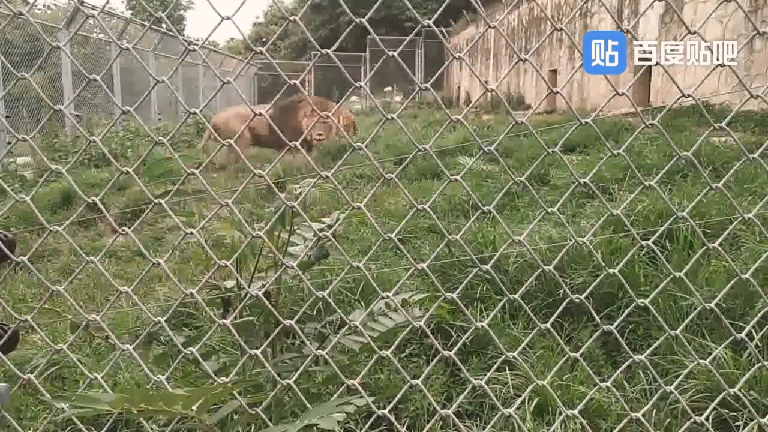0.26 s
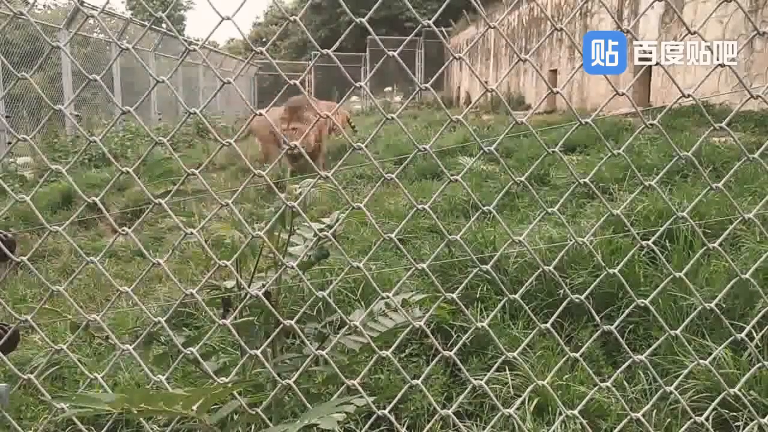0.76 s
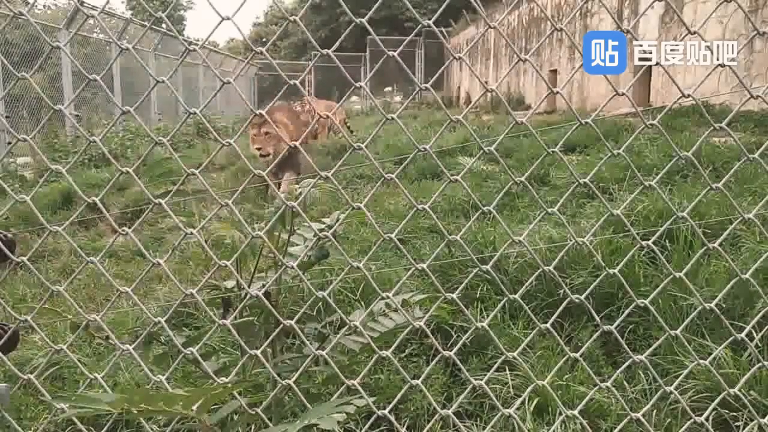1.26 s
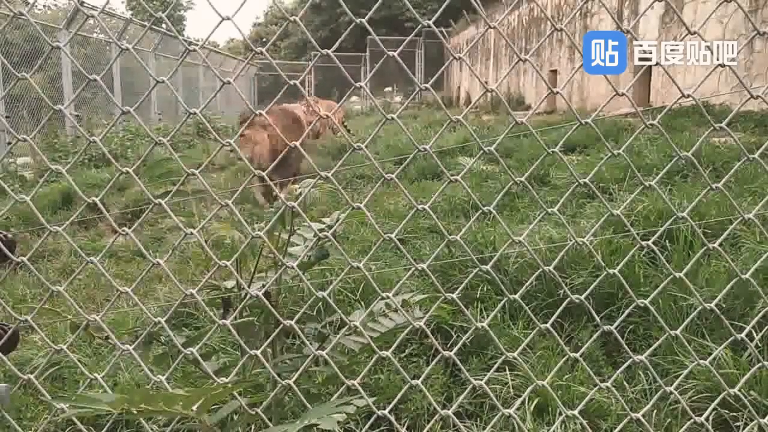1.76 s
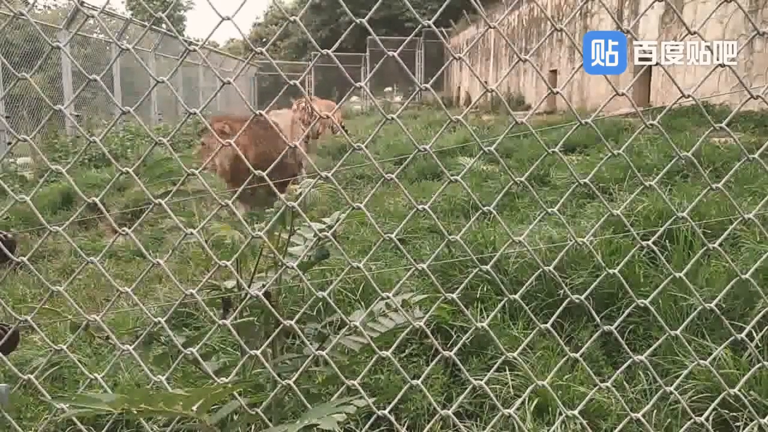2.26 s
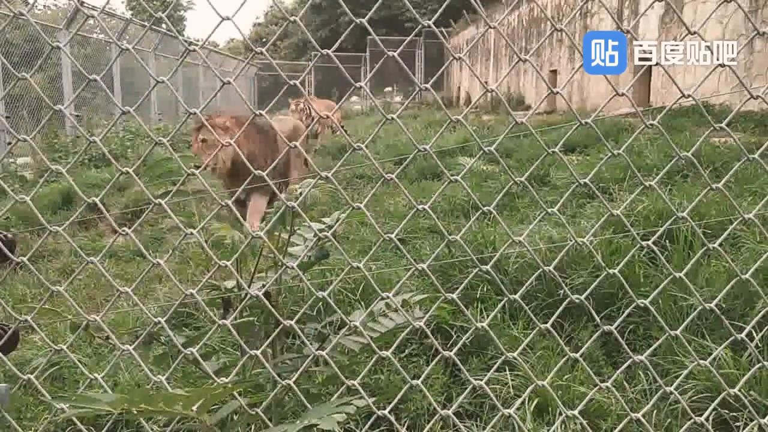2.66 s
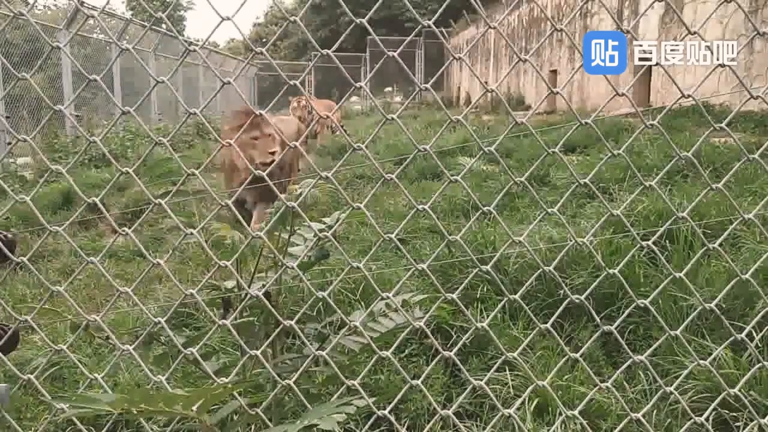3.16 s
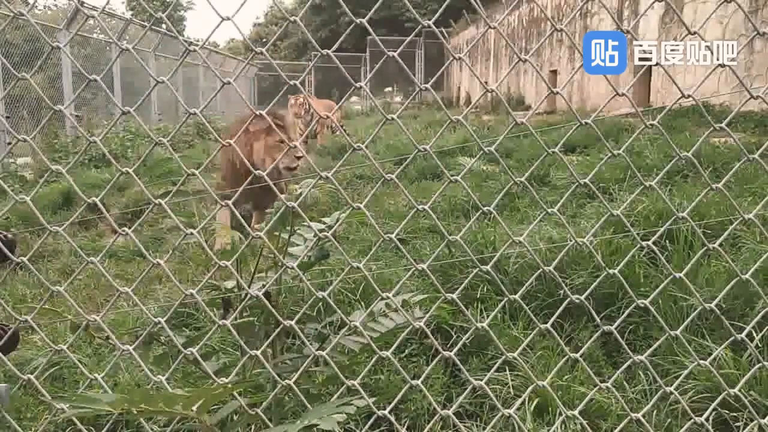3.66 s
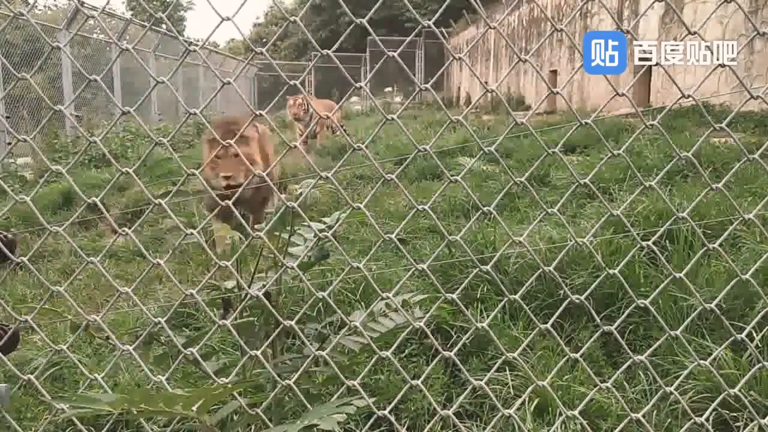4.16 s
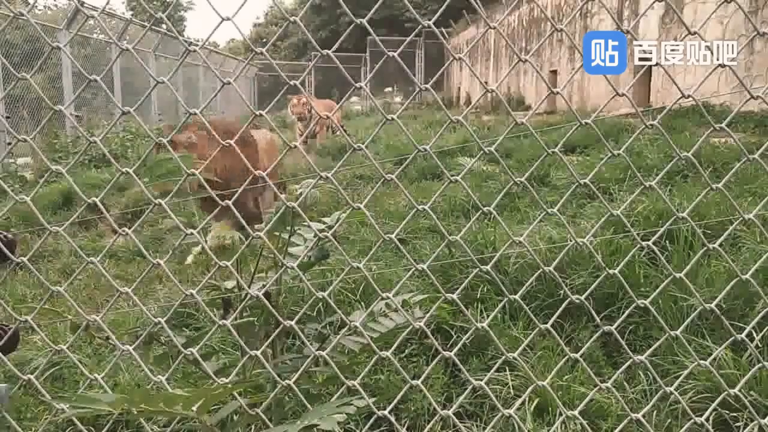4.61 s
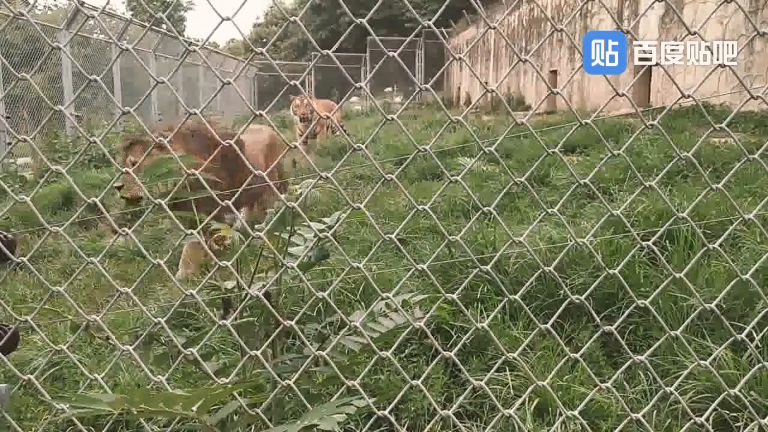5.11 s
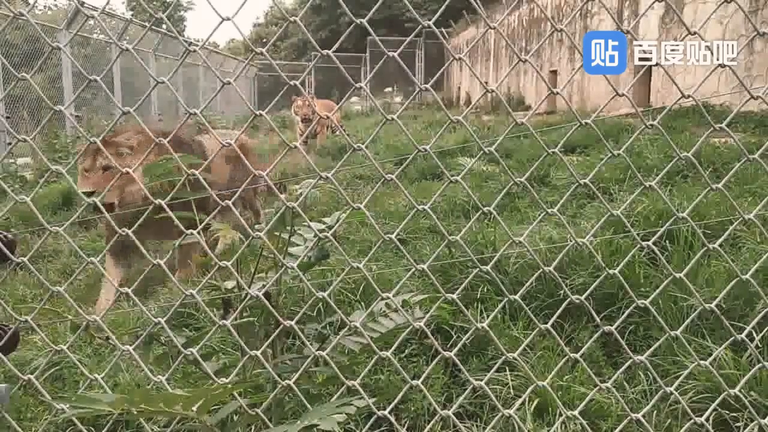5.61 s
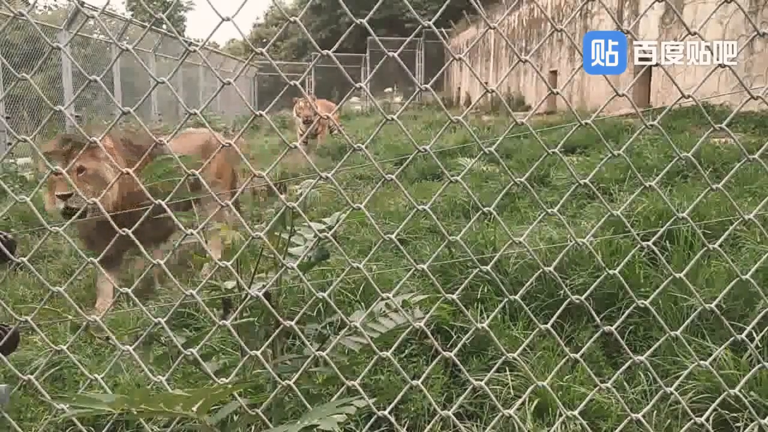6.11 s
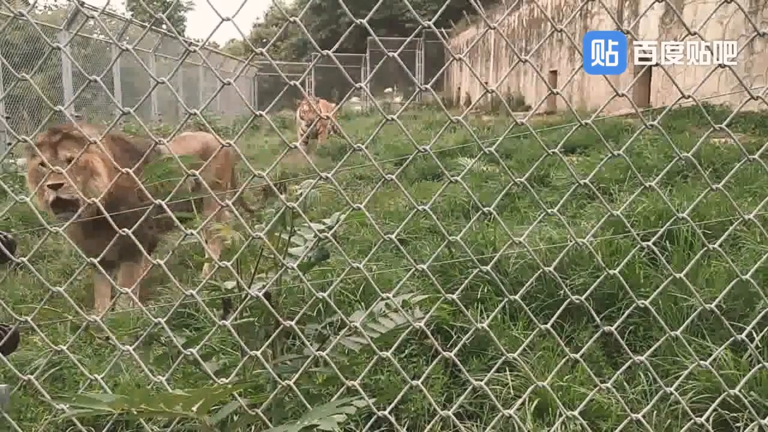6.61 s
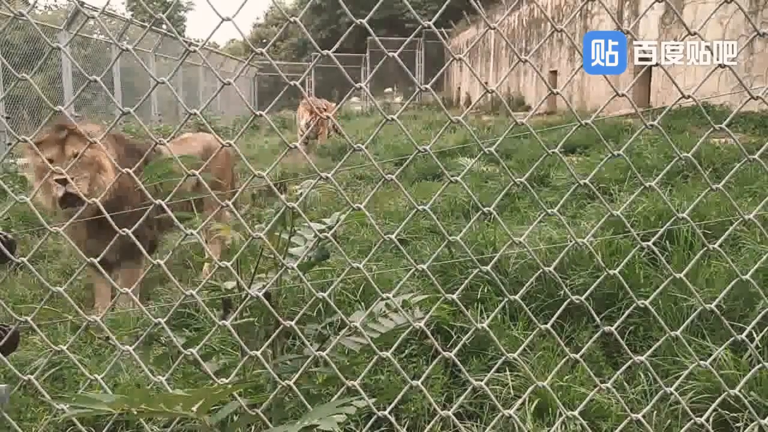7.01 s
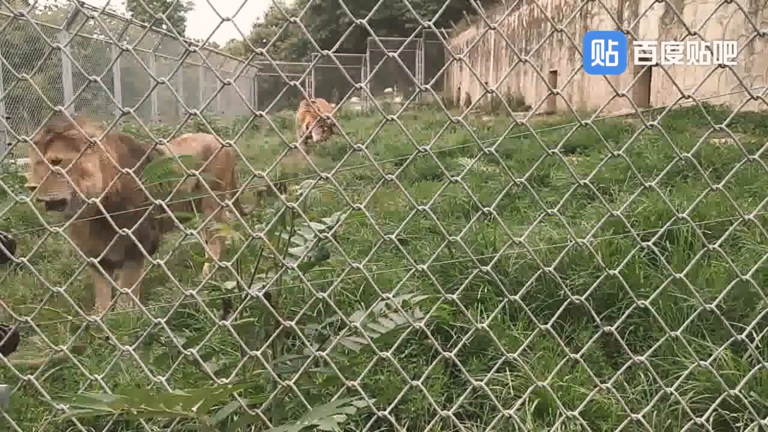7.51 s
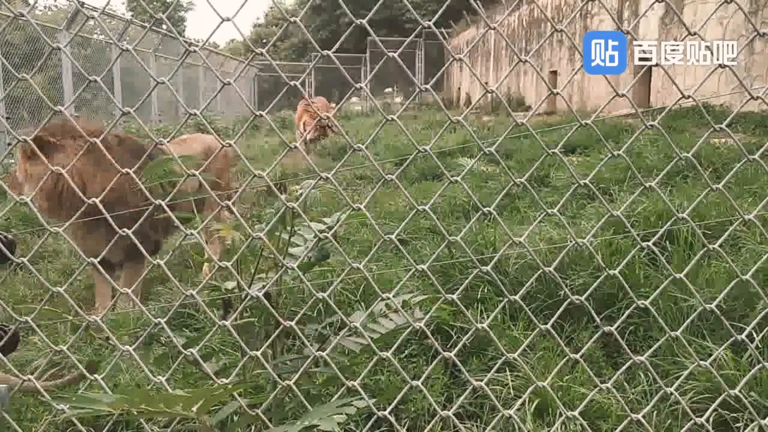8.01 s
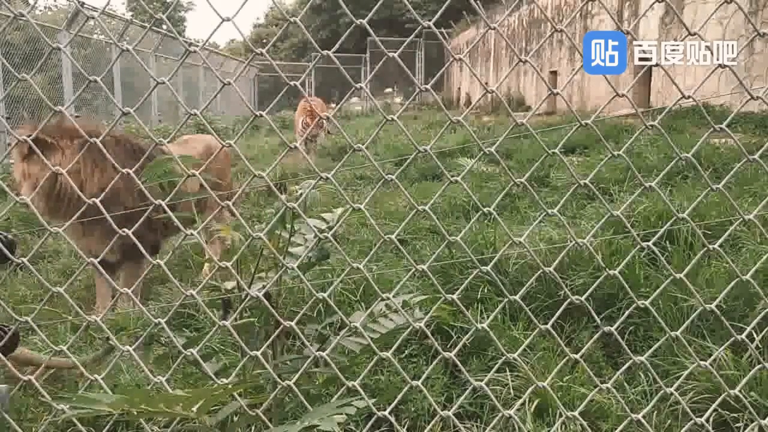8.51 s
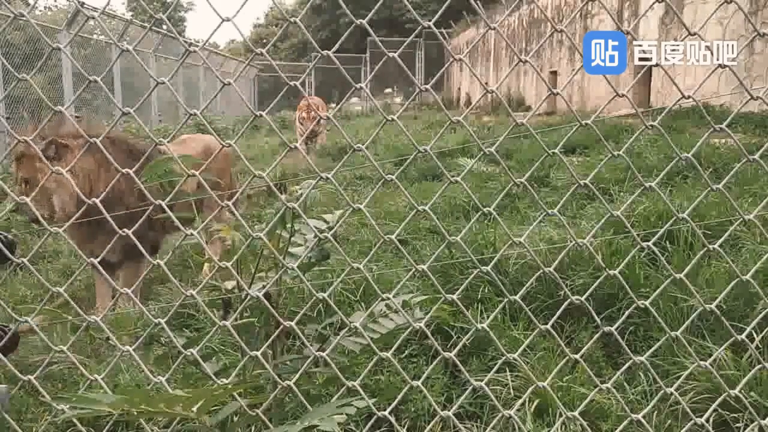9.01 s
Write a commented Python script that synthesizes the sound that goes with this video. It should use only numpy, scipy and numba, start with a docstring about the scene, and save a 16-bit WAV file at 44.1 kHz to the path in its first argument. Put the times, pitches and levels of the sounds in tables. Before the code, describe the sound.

In a grassy outdoor enclosure, a lion lets out a run of low, throaty grunts, dragging in air hoarsely between the early ones as another big cat huffs. The gaps lengthen and the grunts weaken. Faint cicadas and a low, far road drone continue throughout, with soft rustles and distant bird chatter. Near the end a far bird squawks once before a last quiet grunt.

```python
"""A lion's closing grunts

A lion ends a bout of roaring with grunts that grow sparser and fainter as he crosses a grassy enclosure.
Each is a source and a filter: heavy vocal folds rattle slowly and excite the resonances of a long throat.
Between the early ones he drags air in hoarsely, and a second cat huffs back. Behind them are cicadas,
distant traffic, rustles, one bush cricket and a faint bird."""
import sys
import numpy as np
from scipy import signal
from scipy.fft import rfft, irfft, next_fast_len
from scipy.io import wavfile
from numba import njit

SR = 44100
rng = np.random.default_rng(int(sys.argv[2]) if len(sys.argv) > 2 else 0)


def output_pcm(signal):
    """Save a mono or channel-first signal as 16-bit PCM at the path in sys.argv[1].

    Samples are clipped to [-1, 1] before scaling.
    """
    pcm = np.clip(np.atleast_2d(signal).T, -1, 1) * 32767
    wavfile.write(sys.argv[1], SR, np.round(pcm).astype(np.int16))


N = 408366
T = np.arange(N) / SR


def undb(db):
    """Decibels to amplitude ratio."""
    return 10 ** (np.asarray(db) / 20)


def rms(x):
    """Root-mean-square amplitude."""
    return np.sqrt(np.mean(x ** 2)) + 1e-12


def noise(spectrum):
    """Spectral shaping: noise of unit RMS, coloured by (Hz, dB) points."""
    hz, db = np.transpose(spectrum)
    n = next_fast_len(N, real=True)
    bins_hz = np.maximum(np.fft.rfftfreq(n, 1 / SR), 1)
    gain = undb(np.interp(np.log(bins_hz), np.log(hz), db, left=-90, right=-90))
    y = irfft(rfft(rng.standard_normal(n)) * gain, n)[:N]
    return y / rms(y)


def wander(rate_hz, t=T):
    """Random modulation: straight lines between Gaussian values, with a spread near 1."""
    knots = rng.standard_normal(int(t[-1] * rate_hz) + 2)
    return np.interp(t * rate_hz, np.arange(len(knots)), knots)


def add(out, start_s, x):
    """Superposition: mix x in from a start time."""
    i = max(int(start_s * SR), 0)
    out[i:i + len(x)] += x[:max(N - i, 0)]


@njit
def bandpasses(x, hz, widths):
    """State-variable band-passes in series, whose common centre may move every sample."""
    y = np.empty(len(x))
    band, low = np.zeros(len(widths)), np.zeros(len(widths))
    for i in range(len(x)):
        g, u = np.tan(np.pi * hz[i] / SR), x[i]
        for j in range(len(widths)):
            damping = widths[j] / hz[i]
            u += 1e-18 * (i & 1)  # prevents underflow
            v = (band[j] + g * (u - low[j])) / (1 + g * (g + damping))
            band[j], low[j] = 2 * v - band[j], low[j] + 2 * g * v
            u = damping * v
        y[i] = u
    return y


def resonance(x, hz, width_hz, skirt=4.55):
    """A damped resonator; two wider passes steepen its skirts."""
    return bandpasses(x, hz * np.ones(len(x)), width_hz * np.array([1., skirt, skirt]))


def formants(x, modes, tuning=1):
    """Parallel resonators (Hz, width in Hz, dB), all tuned by one factor."""
    return sum(undb(db) * resonance(x, hz * tuning, width) for hz, width, db in modes)


# Spectrum of outdoor air. Each row: frequency in Hz, relative level in dB.
AIR_SPECTRUM = [(20, -38), (40, -7), (62, 5.5), (85, 4.5), (160, 4), (240, -8), (370, -2.5), (520, -12),
                (1100, -18), (1800, -19), (3000, -18), (4800, -23.5), (11000, -42), (15500, -29.5)]
# Passing vehicles. Each row: nearest moment in seconds, time to fall to 1/e in seconds, peak in dB.
VEHICLE_PASSES = [(0, 1.16, -56), (6.296, 0.23, -55), (8.85, 0.5, -53)]
def air_and_traffic(air_db=-57, road_db=-66):
    """Ambient noise: restless air, and a low road drone that swells as each vehicle passes."""
    passes = sum(undb(db) * np.exp(-((T - s) / span) ** 2) for s, span, db in VEHICLE_PASSES)
    road = noise([(70, -11.5), (130, -8.5), (200, 5), (270, -10), (370, -11.5), (520, -42), (1000, -42)])
    air = undb(air_db + .28 * wander(2.75)) * noise(AIR_SPECTRUM)
    return air + (undb(road_db) + passes) * road


# Spectrum of the far cicadas. Each row: frequency in Hz, relative level in dB.
CHORUS_SPECTRUM = [(4000, -33.5), (5400, -24.5), (6200, -14), (6800, -8), (7300, -2), (7900, -2),
                   (8400, -3), (9000, -11), (9700, -20.5), (10600, -31), (12000, -41)]
# Songs of the nearest cicada. Each row: start and end in seconds, pitch in Hz, level in dB.
CICADA_SONGS = [(-.5, 1.9, 6540, -54.5), (4.9, 7.85, 6580, -53.5), (8.499, 9.6, 6790, -53.5)]
def cicadas(chorus_db=-46, side_db=-17, tymbal_hz=440, drift_hz=40, attack_s=.63, release_s=.097):
    """Amplitude modulation: the tymbal rate gives one singer sidebands, over a smooth stereo chorus."""
    starts, _, pitches, _ = np.transpose(CICADA_SONGS)
    hz = pitches[np.searchsorted(starts[1:], T)] + drift_hz * wander(2)
    level = sum(undb(db) * np.clip(np.minimum((T - start) / attack_s, (end - T) / release_s), 0, 1)
                for start, end, _, db in CICADA_SONGS)
    smear = signal.sosfilt(signal.butter(1, 55, fs=SR, output="sos"), rng.standard_normal(N))
    carrier = smear * np.sin(2 * np.pi * np.cumsum(hz) / SR)
    song = resonance(carrier * (1 + .9 * np.cos(2 * np.pi * tymbal_hz * T)), 7140, 2300)
    mid = undb(chorus_db + .67 * wander(3.05)) * noise(CHORUS_SPECTRUM) + level * song / rms(song)
    side = undb(chorus_db + side_db) * noise(CHORUS_SPECTRUM)
    return np.array([mid + side, mid - side])


def bush_cricket(start_s=8.38, end_s=8.63, db=-68):
    """Gated band noise: one short, very high buzz in the grass."""
    gate = np.clip(np.minimum(T - start_s, end_s - T) / .027, 0, 1)
    return undb(db) * gate * noise([(11000, -18), (12500, -5), (15500, -4)])


def bird_chatter(rate_hz=11, low_hz=1800, high_hz=3300, blur_hz=550):
    """Frequency sweeps: quick rising chips, blurred by distance, that hush around the hoarse call."""
    cycle = np.cumsum(rate_hz * (1 + .2 * wander(9))) / SR % 1
    chip = np.clip(cycle / .38, 0, 1)
    hz = low_hz + (high_hz - low_hz) * chip + blur_hz * wander(1500)
    tone = np.sin(2 * np.pi * np.cumsum(hz) / SR)
    bout = np.interp(T, [5, 6.8, 8, 8.1, 8.65, 8.75], [.61, 1.94, .84, .1, .1, 1.3])
    return undb(-64 + 2 * wander(4.3)) * np.sin(np.pi * chip) * tone * bout


# Contour of a far bird's call. Each row: time in seconds, pitch in Hz, level in dB.
SQUAWK_CONTOUR = [(8.08, 1680, -90), (8.16, 1696, -63.5), (8.29, 1754, -58), (8.33, 2370, -53.5),
                  (8.36, 2350, -83)]
def bird_squawk(octave_db=-2):
    """Random frequency modulation makes a rising tone and its octave hoarse."""
    times, pitches, levels = np.transpose(SQUAWK_CONTOUR)
    hz = np.interp(T, times, pitches) * (1 + .14 * wander(2500))
    db = np.interp(T, times, levels) + 2 * wander(90)
    phase = 2 * np.pi * np.cumsum(hz) / SR
    return undb(db) * (np.sin(phase) + undb(octave_db) * np.sin(2 * phase))


# Sniffs and rustles. Each row: middle and nominal length in seconds, centre and width in Hz, peak in dB.
RUSTLES = [ (3.077, 0.072, 420, 220, -56), (2.994, 0.37, 1730, 170, -67), (5.605, 0.13, 850, 470, -61.5),
           (4.92, .35, 1630, 140, -66.5), (6.335, 0.39, 1730, 830, -66.5), (7.37, .21, 255, 140, -51.5),
           (7.374, .2, 1360, 1400, -60.5), (8.36, 0.21, 323, 87, -57), (8.531, .15, 3900, 340, -65)]
def rustles():
    """Windowed band noise: soft swells from the moving animals."""
    out = np.zeros(N)
    for middle, length, hz, width, db in RUSTLES:
        y = resonance(rng.standard_normal(int(1.4 * length * SR)), hz, width)
        add(out, middle - len(y) / SR / 2, undb(db) * np.hanning(len(y)) * y / rms(y))
    return out


def enclosure(x, t60_s=.85, wet_db=-21, damping_hz=2200):
    """Reverberation: walls and trees add weak, dull scatter to the direct sound."""
    t = np.arange(SR) / SR
    tail = rng.standard_normal(SR) * undb(-60 * t / t60_s) * np.clip(t / .043, 0, 1)
    tail = signal.lfilter(*signal.butter(1, damping_hz, fs=SR), tail / np.linalg.norm(tail))
    return x + undb(wet_db) * signal.fftconvolve(x, tail)[:N]


# The second cat's huffs. Each row: start, rise time and decay constant in seconds, peak in dB.
HUFFS = [(0.554, 0.0075, 0.14, -42), (1.504, 0.0056, 0.12, -36), (2.57, 0.0096, 0.034, -46)]
# Spectrum of a huff. Each row: frequency in Hz, relative level in dB.
HUFF_SPECTRUM = [(60, -16), (200, -17), (400, 7.5), (560, -2.5), (780, -2.5), (1200, -21), (1900, -15),
                 (3000, -22), (4100, -15), (6000, -24), (10000, -39), (15000, -44)]
def second_cat():
    """Breath noise through an open mouth rises quickly and decays exponentially."""
    level = sum(undb(db) * np.clip((T - s) / rise, 0, 1) * np.exp(-np.maximum(T - s - rise, 0) / decay)
                for s, rise, decay, db in HUFFS)
    return level * noise(HUFF_SPECTRUM)


# The lion's inward breaths. Each row: start and crest in seconds, level in dB, relative hum in dB.
INHALES = [ (0.072, 0.168, -40.5, 4.5), (.46, 0.59, -36.5, 4), (0.793, 0.891, -41, 11),
           (0.946, .973, -48.5, -6), (1.278, 1.426, -41, 6.5), (1.688, 1.831, -41.5, 6),
           (1.889, 1.92, -54, -6), (2.42, 2.542, -49, 9), (3.196, 3.277, -48.5, 6.5),
           (3.347, 3.39, -45.5, 1), (3.96, 4.116, -56, -4), (4.188, 4.212, -50.5, -6),
           (5.671, 5.723, -45, 8)]
# Airway formants on inhaling. Each row: centre and width in Hz, gain in dB.
AIRWAY_MODES = [(347, 58, 6.5), (440, 42, 3), (1035, 148, 4.5), (1155, 37, 1), (1304, 117, -1),
                (1586, 130, -8.5), (2390, 130, -16.5), (3440, 740, -20)]
def inhale(start, crest, air_db, hum_db, flutter_hz=140, swell_db=16, release_db_per_s=353):
    """Flow-induced vibration: indrawn air hisses in the airway and sets slack folds humming unevenly."""
    rise_s = crest - start
    t = np.arange(int((rise_s + .1) * SR)) / SR
    slack = np.clip(1 - t / rise_s, 0, 1)
    air_db = air_db - swell_db * slack ** 2 - release_db_per_s * np.maximum(t - rise_s, 0)
    hum_db = hum_db - 14.5 * slack  # the folds hum only as the flow grows strong
    phase = 2 * np.pi * np.cumsum(flutter_hz * (1 + .104 * wander(70, t))) / SR
    flicker = undb(2 * wander(60, t))
    hiss = formants(rng.standard_normal(len(t)) * (1 + .5 * np.cos(phase)) * flicker, AIRWAY_MODES)
    rumble = resonance(rng.standard_normal(len(t)), 91, 52)
    hum = np.sin(phase) * flicker + .38 * rumble / rms(rumble)
    gate = np.clip(np.minimum(t / .0026, (t[-1] - t) / .013), 0, 1)
    return gate * undb(air_db) * (undb(-1) * hiss / rms(hiss) + undb(hum_db) * hum / rms(hum))


def fold_pulses(t, length, first_hz, settled_hz, rough, flutter_hz=117.95, jitter_s=.0007, count=4):
    """Glottal source: the folds slap shut once a cycle, then flutter, less so as pressure falls."""
    phase = np.cumsum(settled_hz + (first_hz - settled_hz) * np.exp(-t / .05)) / SR
    cycles = np.arange(np.ceil(np.interp(length - .015, t, phase)))
    slap_s = np.interp(cycles, phase, t)[:, None]
    jitter, scatter = rng.standard_normal((2, len(cycles), count))
    k = np.arange(count)
    closure_s = slap_s + k / flutter_hz + jitter_s * np.sqrt(k) * jitter
    size = np.clip(rough * (1.2 - slap_s / length), 0, .9) ** k * undb(2 * (1 + k) * scatter)
    size /= np.linalg.norm(size, axis=1, keepdims=True)  # the closures of a cycle share its energy
    samples = np.clip(closure_s * SR, 0, len(t) - 1).astype(int)
    return np.bincount(samples.ravel(), size.ravel(), len(t))


def turbulence(t, length, pulses, rough, puff_s=.005, leak_db=-7):
    """Aspiration noise: each closure lets out a puff, over a dwindling leak."""
    puffs = signal.lfilter([1], [1, -np.exp(-1 / (puff_s * SR))], pulses) * rng.standard_normal(len(t))
    leak = np.clip(1 - t / length, 0, 1) * rng.standard_normal(len(t))
    return puffs / rms(puffs) + undb(leak_db) * rough * leak / rms(leak)


def effort(t, length, swell_s, fade_db, open_s, swell_db_per_s=111, release_s=.066, shut_s=.1):
    """Envelopes in dB of pressure, throat and mouth: pressure swells and fades; the jaw muffles."""
    t = np.minimum(t, length)
    swell = swell_db_per_s * np.maximum(swell_s - t, 0)
    fade = fade_db * np.clip((t - swell_s) / (length - swell_s), 0, 1)
    spent = 6.5 * np.clip(1 - (length - t) / release_s, 0, 1)  # pressure gives out: softer and duller
    shut = np.clip((t - open_s) / shut_s, 0, 1)
    return -swell - fade - spent, -15 * shut, -22.5 * shut - spent


# Chest resonances. Each row: nominal centre and width in Hz, gain in dB.
CHEST_MODES = [(98.3, 31.3, 5), (136.6, 11.6, -6), (57.7, 7.3, -12)]
# Snout resonances. Each row: multiple of the snout frequency, width in Hz, gain in dB.
SNOUT_MODES = [(0.999, 82, -8), (1.169, 80, -7), (1.45, 178, -14.5), (1.75, 262, -17), (2.4, 754, -24)]
# The lion's grunts. Each row: start and end in seconds, first and settled slap rate in Hz,
# roughness from 0 to 1, base level in dB, swell in seconds, fade in dB, jaw-open time in seconds,
# throat, mouth and rasp offsets in dB, nominal throat, mouth, lip and snout resonances in Hz.
GRUNTS = [ (.001, 0.052, 14, 12, 0.29, -33, 0, 20, .05, 6.5, -9.5, 9, 331, 880, 1356, 2090),
          (0.262, 0.446, 31.7, 25.2, 1, -29.5, 0.035, 9, 0.18, -1.5, -12, 7, 313, 897, 1278, 1820),
          (0.697, 0.786, 56, 25, 0.38, -31.5, 0.0027, 20, .09, -4.5, -6.5, -2.5, 298, 920, 1243, 1960),
          (0.976, 1.237, 37.4, 21.7, .59, -34.5, 0, 3, 0.18, -3, -7.5, 1, 333, 920, 1316, 1830),
          (1.507, 1.64, 28.6, 34, 0.66, -28, 0.074, 1, 0.08, -4, -13.5, -8, 334, 925, 1247, 2110),
          (1.925, 2.219, 32.3, 23.6, 0.7, -34.5, 0, 5.5, 0.25, -2.5, -8, -3, 326, 920, 1237, 2060),
          (2.532, 2.61, 31.4, 26.3, 0.6, -37, 0.0041, 13, .08, -1.5, -2, -0.5, 326, 960, 1062, 2065),
          (2.666, 2.968, 25, 24, 0.72, -38, 0.044, 7.5, 0.12, -2.5, -4.5, -0.5, 335, 1018, 1178, 1934),
          (3.404, 3.708, 25.4, 20.9, 0.7, -35.5, 0, 6.5, 0.19, -4, -10.5, 4, 334, 973, 1277, 1954),
          (4.223, 4.54, 24.1, 22.5, 0.59, -44, 0.053, 3.5, 0.095, -4, -1.5, 4.5, 365, 1044, 1200, 1900),
          (5.013, 5.211, 26, 24, 0.54, -42.5, 0.068, 4, .14, -6.5, -6, 1, 387, 1037, 1145, 2054),
          (5.726, 6.03, 23.9, 23.5, 0.7, -36.5, 0, 13, .14, -5, -8, 5.5, 370, 1086, 1477, 2020),
          (6.655, 7.014, 18.9, 22.9, 0.83, -39, 0.045, 8.5, 0.17, -8, -6.5, 5, 387, 1027, 1356, 1984),
          (7.712, 7.97, 29.6, 25, 0.52, -43.5, 0.048, 4.5, 0.11, -18, -19.5, 9.5, 356, 750, 1410, 2090),
          (9.135, 9.24, 23, 27.3, 0, -49, 0.013, 0, .09, -19, -15, 7, 332, 806, 1500, 2000)]
def grunt(start, end, first_hz, settled_hz, rough, level_db, swell_s, fade_db, open_s,
          throat_db, mouth_db, rasp_db, throat_hz, mouth_hz, lip_hz, snout_hz):
    """Source and filter: fold closures and their turbulence excite chest, throat, mouth and snout."""
    length = end - start
    t = np.arange(int((length + .15) * SR)) / SR
    pressure_db, throat_muffle_db, mouth_muffle_db = effort(t, length, swell_s, fade_db, open_s)
    throat_db = throat_db + throat_muffle_db
    mouth_db = mouth_db + mouth_muffle_db + wander(24.2, t)  # some slaps burst through harder
    pulses = fold_pulses(t, length, first_hz, settled_hz, rough)
    air = turbulence(t, length, pulses, rough)
    # The closing jaw lowers the resonances, and the soft throat wobbles.
    tuning = 1.025 - .22 * np.minimum(t, length) + .018 * wander(25, t)

    def cavity(modes, db, breath):
        """Forced response of one cavity to the closures and a share of air."""
        drive = pulses / rms(pulses) + breath * air
        steady = formants(drive, modes, tuning)[:int(length * SR)]
        return formants(drive * undb(level_db + pressure_db + db), modes, tuning) / rms(steady)

    upper_db = np.interp(throat_hz, [340, 390], [-24, -12])  # a wide throat lets a higher mode speak
    throat = [(throat_hz, 28, 0), (throat_hz, 40, -8), (458, 22, -6), (700, 45, upper_db)]
    mouth = [(mouth_hz, 40, 0), ((mouth_hz + lip_hz) / 2, 100, -7),
             (lip_hz, 55, -2), (1.158 * lip_hz, 80, -14)]
    snout = [(ratio * snout_hz, width, db) for ratio, width, db in SNOUT_MODES]
    return (cavity(CHEST_MODES, db=1, breath=.4)
            + cavity(throat, throat_db + .5, breath=.5)
            + cavity(mouth, mouth_db + 1, breath=.85)
            + cavity(snout, mouth_db + rasp_db - 12, breath=2.2))


def lion():
    """The breathing cycle: grunts on the outflow, hoarse breaths on the inflow."""
    out = np.zeros(N)
    for row in GRUNTS:
        add(out, row[0], grunt(*row))
    for row in INHALES:
        add(out, row[0], inhale(*row))
    return out


def scene():
    """Superposition: only the cats reverberate, and only the cicada chorus spreads in stereo."""
    background = air_and_traffic() + cicadas() + bush_cricket() + bird_chatter() + bird_squawk()
    return background + rustles() + enclosure(second_cat() + lion())


def record(dry, low_hz=24, top_hz=15500):
    """Band limiting: the microphone sheds the deepest bass, and the top is cut steeply."""
    y = signal.sosfilt(signal.butter(2, low_hz, "high", fs=SR, output="sos"), dry)
    return signal.sosfilt(signal.ellip(8, .2, 70, top_hz, fs=SR, output="sos"), y)


dry = scene()
out = record(dry)
output_pcm(out)
```